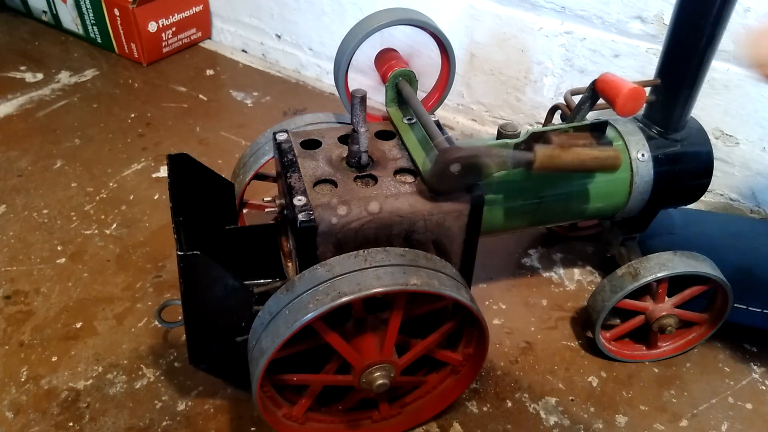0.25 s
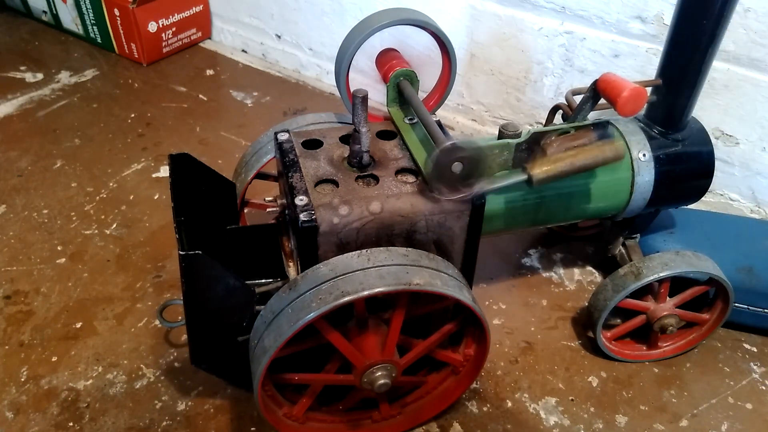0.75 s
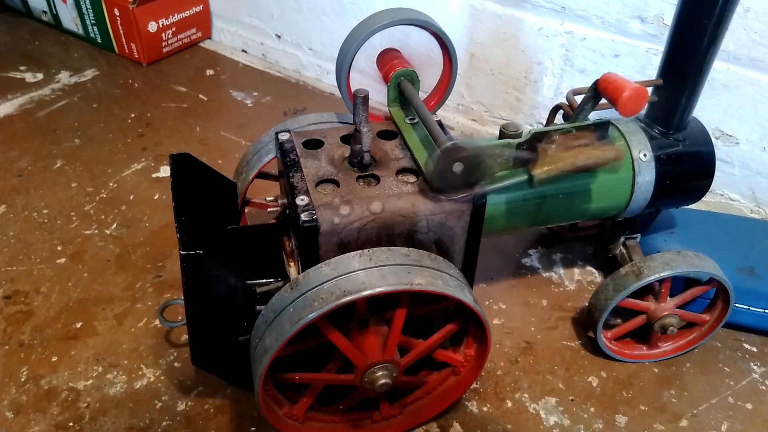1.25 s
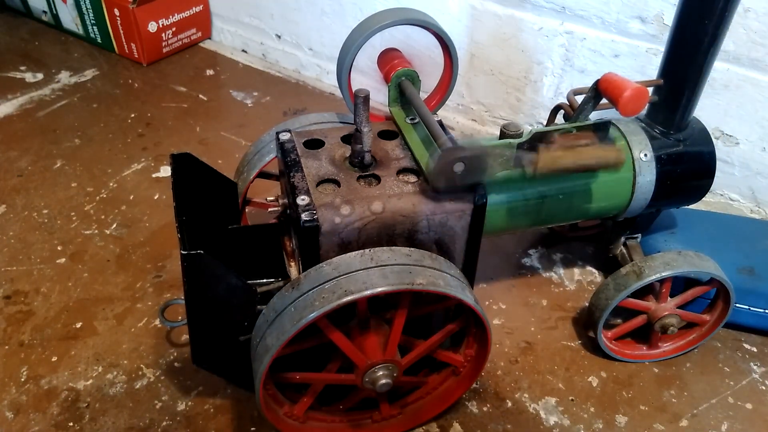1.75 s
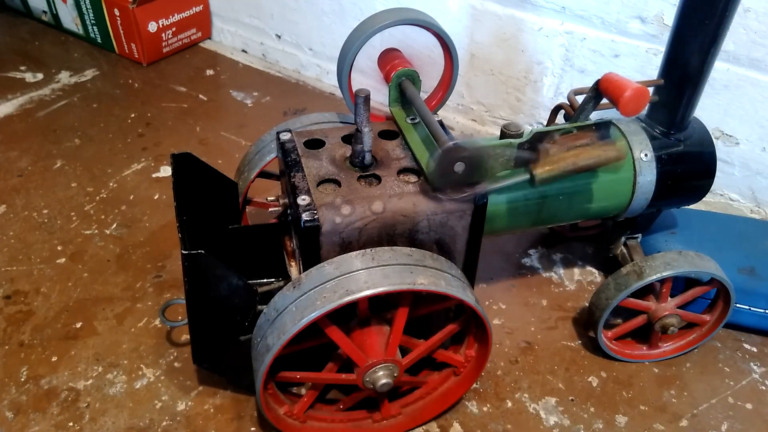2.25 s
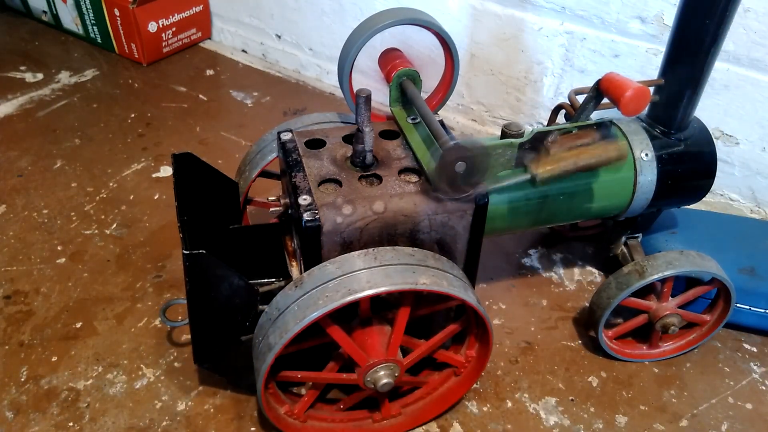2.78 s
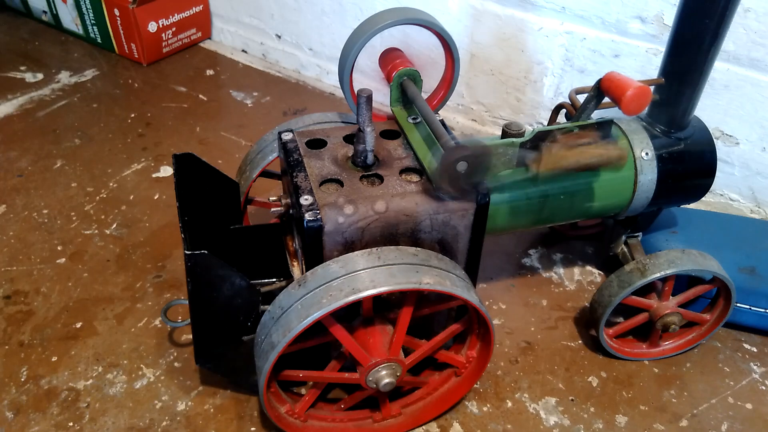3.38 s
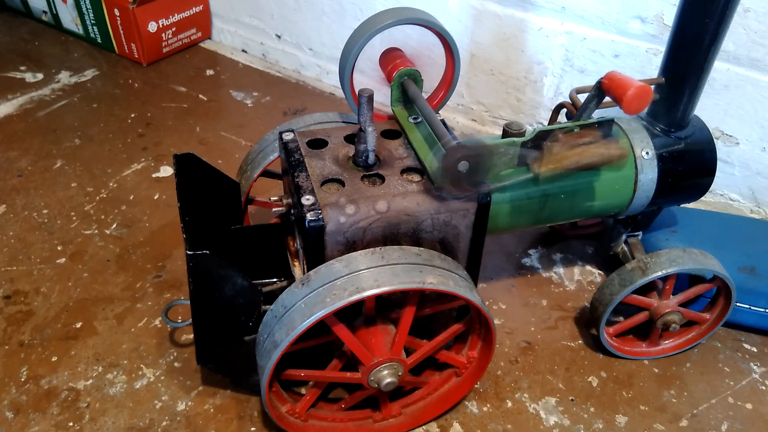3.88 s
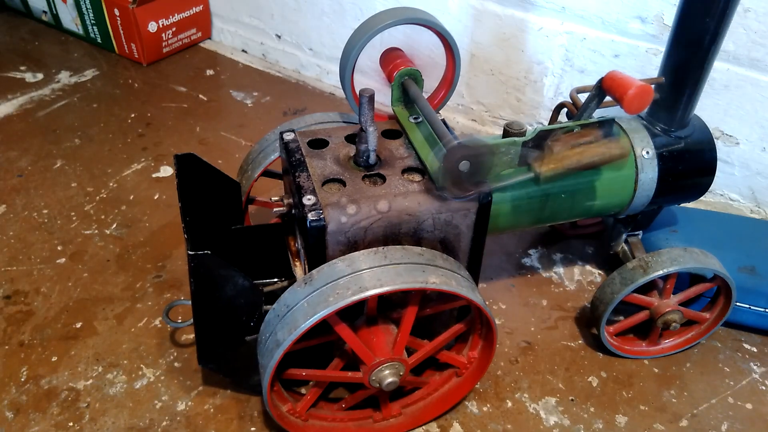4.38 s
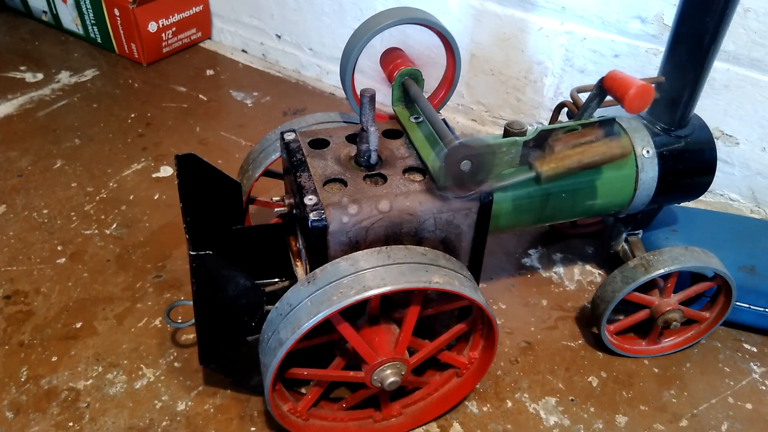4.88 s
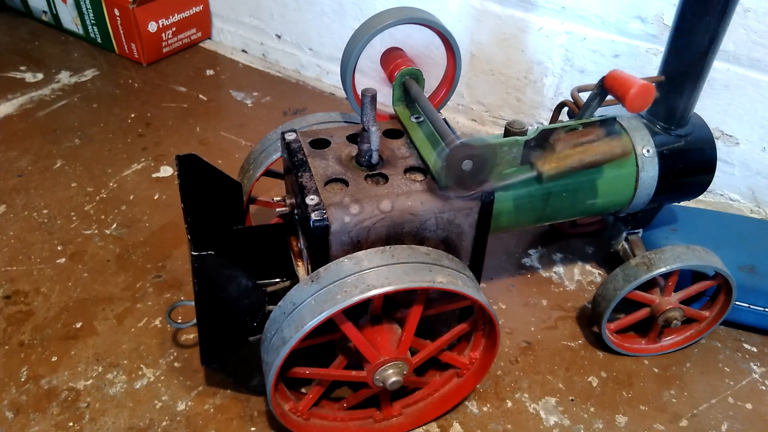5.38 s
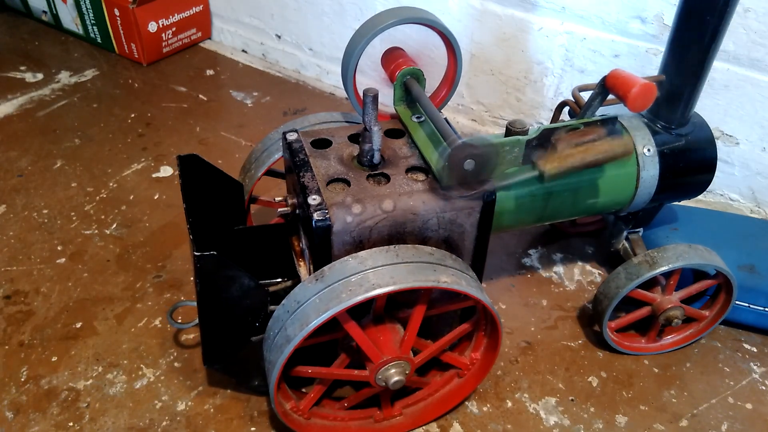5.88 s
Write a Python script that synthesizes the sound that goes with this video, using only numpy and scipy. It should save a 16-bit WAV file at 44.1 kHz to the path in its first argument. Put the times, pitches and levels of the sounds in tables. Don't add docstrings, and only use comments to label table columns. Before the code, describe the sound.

Close stereo in a small room with a short, dull echo. At 0 s a hand releases a lever with two soft chattering knocks and a tiny spit of steam; a toy steam engine turns, its low wooden knocks quickening from about six to seventeen a second, exhaust choked by water. Around 0.7 to 0.9 s slugs crack and gurgle, then the port clears: from about 1.0 to 1.7 s a loud, wet, bright rush of steam sputters, fizzes and whistles thinly in rapid puffs, two per turn, while bench booms, boiler clanks and loose parts rattle. From 1.75 to 2.7 s the blasts weaken unevenly, with renewed dry knocking and fizz. After about 2.75 s it drops to much quieter, dry, even chuffing at nearly twenty-four turns a second, a buzzing patter with light ticking, faint leak hiss, softly ringing plates and occasional small spits until 6 s.

```python
import sys
import numpy as np
from scipy import signal
from scipy.fft import rfft, irfft, next_fast_len
from scipy.io import wavfile
from scipy.ndimage import uniform_filter1d

SR = 44100
rng = np.random.default_rng(int(sys.argv[2]) if len(sys.argv) > 2 else 0)


def log_audio(samples):
    frames = np.atleast_2d(samples).T
    limited = np.clip(frames, -1, 1)
    pcm = np.round(limited * 32767).astype(np.int16)
    wavfile.write(sys.argv[1], SR, pcm)


def ratio_of_db(decibels):
    return 10 ** (np.asarray(decibels, float) / 20)


N = 270333
SIZE = next_fast_len(N)
TIME_S = np.arange(N) / SR
FFT_HZ = np.arange(SIZE // 2 + 1) * SR / SIZE

# time in seconds, speed in turns per second.
SPEED = [(-.12, 5.731), (.2, 11.565), (.5, 13.709), (.8, 17.058), (1.05, 17.931), (1.2, 19.224),
         (1.6, 20.838), (2, 21.935), (2.5, 22.903), (3.2, 23.629), (4, 23.863), (6.3, 23.972)]
# time in seconds, steam flow in dB, load on rod and bearings in dB,
# rocking on the bench in dB.
EFFORT = [(0, -3.5, -40, -16), (.29, -7.5, -29, -0.5), (.45, 1.5, 1, 5), (.6, 1.5, 5, 8), (.74, -5, 7, 12),
          (.84, 12, 15, 14), (1.07, 18.5, 17.5, 13), (1.2, 17.5, 12.5, 15), (1.55, 21.5, 10.5, 15.5),
          (1.86, 18, 12.5, 13), (1.96, 18, 10.5, 6.5), (2.04, 16.5, 19, 2.5), (2.13, 15.5, 8.5, 7.5),
          (2.66, 17.5, 9.5, -1.5), (2.75, 2, 5.5, 0.5), (3.3, 3.5, 3, -1), (4.2, 1, 2, 2),
          (6.13, 1.5, 2.5, 0)]
# frequency in Hz, density in dB per Hz.
MAIN_COLOUR = [(530, -38), (900, 0.5), (1850, -2), (3300, 2.5), (4150, 4.5), (4800, 0), (6250, 1.5),
               (8550, 3), (10600, 1), (11600, -4.5), (14400, -3), (16000, -12)]

FULL_SPEED = 24
CLEARS_S, CHOKED_LEAD_S = 0.9, .007
SLIP = .24
LIGHT_TOP_DB = -4
LAG_S = 0.00015


def rms_one(x):
    return x / np.sqrt(np.mean(x ** 2) + 1e-20)


def evened(x):
    power = np.mean(np.atleast_2d(x) ** 2, axis=0)
    return x / np.sqrt(uniform_filter1d(power, size=SR // 4) + 1e-12)


def in_time(rows):
    s, *columns = np.transpose(rows)
    return [np.interp(TIME_S, s, c) for c in columns]


def at_hz(points, hz):
    point_hz, value = np.array(points).T
    return np.interp(np.log(np.maximum(hz, 1)), np.log(point_hz), value)


def bout(s, length, db, swell, ebb):
    before_s = np.maximum(s - TIME_S, 0)
    after_s = np.maximum(TIME_S - s - length, 0)
    return ratio_of_db(db - swell * before_s - ebb * after_s)


def drift(rate_hz):
    r = np.exp(-2 * np.pi * rate_hz / SR)
    noise = rng.standard_normal(N + SR)
    return rms_one(signal.lfilter([1], [1, -2 * r, r * r], noise)[SR:])


def single_hit(s):
    return signal.unit_impulse(N, round(s * SR))


def fading(clicks, t60, rise_s):
    up = np.exp(-1 / (rise_s * SR))
    fall = signal.lfilter([1], [1, -ratio_of_db(-60 / (t60 * SR))], clicks)
    return signal.lfilter([1 - up], [1, -up], fall)


def ring(clicks, modes):
    out = 0
    for hz, level_db, t60 in modes:
        r, w = ratio_of_db(-60 / (t60 * SR)), 2 * np.pi * hz / SR
        out = out + ratio_of_db(level_db) * signal.lfilter([0, np.sin(w)], [1, -2 * r * np.cos(w), r * r], clicks)
    return out


def crank():
    s = np.arange(SPEED[0][0], SPEED[-1][0], .001)
    return s, -1.002 + np.cumsum(np.interp(s, *np.transpose(SPEED))) * .001


def once_a_turn(angle, spread_db, jitter_s, delay_s=0, slip=0, lead_s=0):
    s, turns = crank()
    chance = rng.standard_normal((int(turns[-1]), 2))
    at_s = np.interp(np.arange(len(chance)) - 1 + angle, turns, s)
    speed = np.interp(at_s, *np.transpose(SPEED))
    slip_s = slip * (1 - speed / FULL_SPEED) / speed
    early_s = lead_s * (at_s < CLEARS_S)
    at = (at_s + slip_s - early_s + delay_s + jitter_s * chance[:, 0]) * SR
    inside = (at >= 0) & (at < N)
    clicks = np.full(N, 1e-18)
    clicks[at[inside].astype(int)] = ratio_of_db(spread_db * chance[inside, 1])
    return clicks


def by_turn():
    s, turns = crank()
    whole_turns = np.floor(np.interp(TIME_S, s, turns) + .05)
    return np.interp(whole_turns + .25, turns, s)


def hiss(spectrum, top_db, jet_db):
    # frequency in Hz, width in Hz, level in dB.
    nozzle = [(5140, 190, -27.5), (7680, 540, -16.5), (9250, 120, -12.5), (11530, 200, -9.5),
              (12400, 280, -19)]
    # frequency in Hz, likeness from 0 to 1.
    likeness = [(100, 1), (500, 0.55), (1500, 0.33), (4000, 0.22), (12000, 0.075)]
    peaks = 0
    for centre_hz, width_hz, db in nozzle:
        peaks = peaks + ratio_of_db(db + jet_db) / np.sqrt(1 + (2 * (FFT_HZ - centre_hz) / width_hz) ** 2)
    alike = np.clip(at_hz(likeness, FFT_HZ), 0, 1)
    mid, side = rfft(rng.standard_normal((2, SIZE)))
    both = np.sqrt(1 + alike) * mid + np.sqrt(1 - alike) * side * [[1], [-1]]
    both = both * ratio_of_db(at_hz(spectrum, FFT_HZ)) * (1 + 3 * peaks)
    upper = np.clip((FFT_HZ - 11900) / 300, 0, 1)
    body = irfft(both * (1 - upper), SIZE)[:, :N]
    top = irfft(both * upper, SIZE)[:, :N]
    return (body + top * ratio_of_db(top_db)) / np.sqrt(np.mean(body ** 2))


def exhaust():
    # start in seconds, length in seconds,
    # main puff in dB, return puff in dB, treble in dB.
    surges = [(.71, .06, -7, 4, 17), (.95, .05, 7, -2, 3), (1.005, .215, 7, -2, 10.5),
              (1.22, .2, 7.5, -5, 21), (1.425, .29, 4.5, -3.5, -6), (1.855, .09, 4, 0, 10),
              (2.08, .18, 3, 4.5, 10), (2.265, .085, 0.5, 4.5, 9), (2.615, .085, 2, 1.5, 0),
              (2.875, .04, 0, 3, 8), (3, .085, 3.5, 7, -1)]
    # start in seconds, peak in dB, treble against body in dB.
    wet_puffs = [(0.8477, -39, -21), (0.9051, -36, -22), (0.963, -28, -17), (1.0188, -22, -18),
                 (1.0752, -23, -12), (1.1286, -22, -19), (1.1815, -23, -13), (1.2343, -18, -7),
                 (1.2857, -20, -5), (1.3361, -19, -7), (1.3865, -19, -8), (1.4364, -21, -24),
                 (1.4853, -20, -26), (1.5342, -19, -18), (1.5826, -24, -24), (1.6299, -25, -30),
                 (1.6783, -24, -31), (1.7257, -31, -34), (1.7726, -30, -40), (1.82, -29, -23),
                 (1.8654, -26, -20), (1.9113, -25, -10), (1.9572, -32, -16), (2.0036, -32, -22),
                 (2.0485, -33, -23), (2.0944, -29, -9), (2.1403, -25, -15), (2.1847, -26, -10),
                 (2.2291, -25, -11), (2.2735, -28, -17), (2.3179, -28, -17), (2.3623, -28, -21),
                 (2.4072, -30, -19), (2.4501, -30, -26), (2.494, -30, -19), (2.5379, -30, -26),
                 (2.5813, -30, -22), (2.6257, -27.5, -15), (2.6691, -27, -30)]
    at = by_turn()
    flow_db = np.interp(at, *np.transpose(EFFORT)[:2])
    wet = np.clip((flow_db - 3.5) / 5, 0, 1)
    choked_db = -23 * (at < CLEARS_S)
    heavy_top_db = -19
    levels_db = np.stack([-52.5 + flow_db + choked_db, -56 + 0.96 * flow_db,
                          LIGHT_TOP_DB + wet * (heavy_top_db - LIGHT_TOP_DB)])
    for s, length, *extra_db in surges:
        levels_db = levels_db + np.outer(extra_db, (at >= s) & (at < s + length))
    main_db, return_db, top_db = levels_db
    wet_puffs = np.array(wet_puffs)
    latest = np.maximum(np.searchsorted(wet_puffs[:, 0], at) - 1, 0)
    s, peak_db, share_db = wet_puffs[latest].T
    listed = (at > s) & (at < s + .025)
    main_db = np.where(listed, peak_db - 8.5, main_db)
    return main_db, return_db, top_db, np.where(listed, share_db + 10.5, top_db)


def steam(leak_db):
    # frequency in Hz, density in dB per Hz.
    return_colour = [(1500, -61), (3000, -6.5), (4500, 3.5), (6000, -18), (7500, -3.5), (9500, 4),
                     (11000, -3), (12800, -3), (14500, -7), (16000, -32)]
    leak_colour = [(60, -11), (400, -8), (600, -2), (1000, 2.5), (1400, -8.5), (2200, -0.5), (2800, -2),
                   (3250, -3), (3900, 0.5), (4800, -4), (5500, 2.5), (6300, -5), (8000, -5), (9300, -4.5),
                   (11600, -5.5), (14900, -4), (16000, -11)]
    main_db, return_db, top_db, main_top_db = exhaust()

    first = ratio_of_db(main_db + 3) * once_a_turn(0, spread_db=.8, jitter_s=.0002)
    first[round(.761 * SR)] = ratio_of_db(-55)
    opening = first + ratio_of_db(-12.5) * np.roll(first, shift=round(SR / 300))
    main = ratio_of_db(1.0) * fading(opening, t60=0.026, rise_s=0.00022)
    main += ratio_of_db(-9.0) * fading(opening, t60=0.061, rise_s=0.0061)
    main_top = ratio_of_db(2.0) * fading(first, t60=0.026, rise_s=0.00043) + ratio_of_db(-15.5) * main
    main_top_db = main_top_db + 7.5 + 20 * np.log10(main_top / main)
    out = main * ratio_of_db(0.48 * drift(360)) * hiss(MAIN_COLOUR, main_top_db, jet_db=12.5)

    second = ratio_of_db(return_db + 3) * once_a_turn(0.517, spread_db=1.6, jitter_s=.0003, slip=SLIP)
    back = fading(second, t60=0.053, rise_s=0.0032)
    back_top = fading(second, t60=0.022, rise_s=.0002) + ratio_of_db(-6) * back
    back_top_db = np.minimum(top_db, 3) + 7.0 + 20 * np.log10(back_top / back)
    out += back * ratio_of_db(1.6 * drift(190)) * hiss(return_colour, back_top_db, jet_db=-35)

    flicker_db = 1.5 * drift(150) + .8 * drift(8)
    pulse_db = 2.3 * np.cos(4 * np.pi * (np.interp(TIME_S, *crank()) - .14))
    leak_top_db = 0.99 * np.minimum(top_db, LIGHT_TOP_DB) + 7.0
    out += ratio_of_db(leak_db - 4.0 + flicker_db + pulse_db) * hiss(leak_colour, leak_top_db, jet_db=4.0)
    return out + spits()


def spits():
    # start in seconds, level in dB, t60 in seconds.
    drops = [(.001, -52, 0.087), (0.094, -53, 0.08), (0.429, -54, 0.12), (0.64, -54, 0.13),
             (.7, -45.5, 0.065), (0.761, -42.5, 0.07), (.847, -35.5, 0.045), (.905, -35, 0.038),
             (3.501, -46.5, 0.15), (3.525, -54.5, 0.81), (4.612, -48, 0.094), (4.9, -53, 0.12),
             (5.554, -49, 0.073), (5.655, -51.5, 0.13)]
    bursts = 0
    for s, db, t60 in drops:
        bursts = bursts + fading(ratio_of_db(db) * single_hit(s) + 1e-18, t60, rise_s=0.002)
    sputter = ratio_of_db(3.5 * drift(200))
    return bursts * sputter * hiss(MAIN_COLOUR, -25, jet_db=-24)


def band_shaped(x):
    # start in seconds, length in seconds, change in dB.
    band_changes = [
        (0.836, .12, -14),
        (1.19, 0.44, 4),
        (1.723, 0.19, -10),
        (1.953, .14, -7),
        (2.126, 0.39, 3),
    ]
    band = irfft(rfft(x, SIZE) * ((FFT_HZ > 9700) & (FFT_HZ < 12100)), SIZE)[:, :N]
    level_db = sum(db * ((TIME_S > s) & (TIME_S < s + length)) for s, length, db in band_changes)
    return x + (ratio_of_db(uniform_filter1d(level_db, size=SR // 100)) - 1) * band


def knocks(boom_db, bench_db, boiler_db, firebox_db, tick_db):
    # crank angle in turns, delay in seconds,
    # push (+) or pull (-), boom in dB, bench in dB, shell in dB.
    contacts = [
        (0, .00027, -.69, -14, 7, -10),
        (0, .003, .61, -8, 6, -6),
        (0, .0057, -.17, -23, 1, 4.5),
        (0, .0084, .53, -3.5, -21, -12),
        (0, .0155, 1, 2.5, -1, -8),
        (.536, .0036, .76, -12, -27, -4),
        (.858, .00058, -.61, -28, -10, -7),
    ]
    # crank angle in turns, delay in seconds,
    # cylinder in dB, linkage in dB.
    face_taps = [
        (0, .001, -9, -9),
        (0, .004, -7, -6),
        (.46, .001, -6, -12),
        (.535, .0022, -4, -12),
        (.535, .0042, -2, -8),
        (.85, .0003, -9, -3),
        (.32, .0003, -20, -6),
    ]
    # frequency in Hz, level in dB, t60 in seconds.
    boom_modes = [(72.4, -30, 0.084), (93.4, -4.5, 0.2), (125.2, 3, 0.24), (144.3, -10, 0.14)]
    bench_modes = [(214.5, -6, .065), (234.75, -6, .025), (314, -12.5, .026), (415, -14, .031)]
    boiler_modes = [(552.5, 10.5, 0.56), (653, 2, 0.7), (726, 5.5, 0.068), (616, 13.5, 0.066)]
    firebox_modes = [(889, -12.5, 0.12), (940, 3, 0.011), (1099, -19, 0.16), (1496, -9, 0.049),
                     (1734, 6, 0.011), (1560, -25, 0.055), (2215, -6, 0.074)]
    cylinder_modes = [(2980, -14, .012), (3780, -3, .016), (3930, 0, .022), (4280, -7, .014),
                      (5550, -12, .015)]
    linkage_modes = [(1566, -11, 0.011), (1797, 10, 0.015), (2156, -11.5, 0.11), (2280, -2, 0.014),
                     (2942, 6.5, 0.028)]
    s, turns = crank()
    speed = np.interp(TIME_S, s, np.gradient(turns, s)) / FULL_SPEED

    boom = bench = shell = 0
    for angle, delay_s, sign, into_boom_db, into_bench_db, into_shell_db in contacts:
        blow = sign * once_a_turn(angle, spread_db=.8, jitter_s=.00003, delay_s=delay_s,
                                  slip=SLIP * (angle > .5), lead_s=CHOKED_LEAD_S)
        blow *= speed ** (250 * delay_s + 3 * angle)
        boom = boom + ratio_of_db(into_boom_db) * blow
        bench = bench + ratio_of_db(into_bench_db) * blow
        shell = shell + ratio_of_db(into_shell_db) * abs(blow)
    taps = links = 0
    for angle, delay_s, cylinder_db, linkage_db in face_taps:
        tap = once_a_turn(angle, spread_db=1.7, jitter_s=.0003, delay_s=delay_s, slip=SLIP * (angle > .5))
        taps = taps + ratio_of_db(cylinder_db) * tap
        links = links + ratio_of_db(linkage_db) * tap

    late, early = np.roll(boom, round(.003 * SR)), np.roll(boom, -round(.0062 * SR))
    boom = np.where(np.arange(N) > CLEARS_S * SR, early, late)
    soft = signal.butter(2, 340, fs=SR)
    low = ratio_of_db(boom_db - 3.0) * evened(ring(signal.lfilter(*soft, boom), boom_modes))
    push = signal.lfilter(*soft, bench)
    weaker = bout(1.7, 0.41, 0, 103, 114)
    upper_bench = ratio_of_db(-15 * weaker) * ring(push, bench_modes[2:])
    low += ratio_of_db(bench_db - 1.0) * evened(ring(push, bench_modes[:2]) + upper_bench)
    low = signal.sosfilt(signal.butter(5, 70, "high", fs=SR, output="sos"), low)

    boiler = ratio_of_db(boiler_db - 8.0) * evened(ring(shell, boiler_modes))
    firebox = ratio_of_db(firebox_db - 3.0) * evened(ring(shell, firebox_modes))
    shell = signal.sosfilt(signal.butter(3, 440, "high", fs=SR, output="sos"), boiler + firebox)

    chatter = fading(taps, t60=.004, rise_s=.0001) * rng.standard_normal(N)
    play = fading(links + 4.4 * abs(bench), t60=0.034, rise_s=0.00012)
    loose = play * rng.standard_normal(N)
    seated = np.clip((speed - .7) / 0.072, .08, 1)
    tick = seated * ratio_of_db(tick_db - 6) * evened(ring(.35 * chatter + 3 * taps, cylinder_modes))
    tick = tick + np.sqrt(seated) * ratio_of_db(tick_db - 12.5) * evened(ring(loose, linkage_modes))
    return deep_shaped(low), shell, tick


def deep_shaped(low):
    # time in seconds, level change in dB.
    deep_level = [(0, -14), (.25, 5.5), (.9, -3), (1.1, 0.5), (1.9, -1), (2.35, -10), (2.6, 4), (3.1, 4.5),
                  (4, -0.5), (5, 4), (6.13, 4.5)]
    deep = irfft(rfft(low, SIZE) / (1 + (FFT_HZ / 101) ** 12), SIZE)[:N]
    return low + (ratio_of_db(in_time(deep_level)[0]) - 1) * deep


def pin():
    # crank angle in turns, delay in seconds, level in dB.
    stroke_ends = [
        (0, .003, 0),
        (.536, .0025, -2),
    ]
    # start in seconds, length in seconds, level in dB.
    bouts = [
        (.84, .3, -59),
        (2.297, .42, -56.5),
        (2.906, 4, -67),
    ]
    # frequency in Hz, level in dB, t60 in seconds.
    pin_modes = [(528, -9.5, 0.018), (695, -2.5, 0.017), (826, -3, 0.017), (1800, -7.5, 0.019)]
    blows = 0
    for angle, delay_s, db in stroke_ends:
        blows = blows + ratio_of_db(db) * once_a_turn(angle, spread_db=1.5, jitter_s=.0001, delay_s=delay_s,
                                              slip=SLIP * (angle > .5))
    return sum(bout(*row, 65, 80) for row in bouts) * evened(ring(blows, pin_modes))


def rattles():
    # start in seconds, length in seconds,
    # frequency in Hz, level in dB, ring in cycles.
    loose_parts = [(0.87, 0.78, 511, -51.5, 19), (1.76, 0.6, 520, -59.5, 48), (1.98, 0.3, 1130, -61, 40),
                   (.45, 0.27, 123.5, -52.5, 18), (1.42, 0.24, 735, -50.5, 47),
                   (1.884, 0.64, 737, -54.5, 66), (1.54, 0.89, 900, -58, 260), (2.48, 0.11, 905, -51, 116),
                   (2.67, 0.37, 905, -65.5, 160), (2.31, 0.21, 133.6, -57, 19),
                   (2.46, 0.034, 208, -52, 6.4), (2.37, 0.28, 652, -61, 69), (1.94, 0.025, 175, -57, 27),
                   (3.63, 0.081, 1560, -63.5, 54), (3.4, 0.038, 1800, -70, 41),
                   (3.43, 0.044, 1580, -68.5, 25), (0.8, .02, 1110, -60, 27), (0.925, 0.043, 890, -53, 52),
                   (1.03, 0.11, 1120, -56, 61)]
    plates = [(2.8, 3.2, 741, -73, 170), (3.4, 2.8, 645, -73.5, 110), (3.98, 0.49, 1450, -69.5, 47),
              (4.4, 2.9, 479, -74.5, 160), (3.9, 2.7, 405, -73, 120), (3.2, 1.9, 744, -83, 52),
              (3.7, 2.8, 330, -75, 70), (3.75, 2.6, 527, -77.5, 39), (3.5, 2.8, 1050, -84.5, 98),
              (3.2, 3, 865, -79.5, 130)]
    blow = once_a_turn(0, spread_db=.8, jitter_s=.00004, delay_s=0.00301)
    out = 0
    for s, length, hz, db, cycles in loose_parts + plates:
        out = out + bout(s, length, db, 133, 77) * evened(ring(blow, [(hz, 0, cycles / hz)]))
    return out


def gurgle():
    # start in seconds, length in seconds, level in dB, frequency in Hz.
    water = [(0.42, 0.2, -68.5, 333), (0.71, 0.31, -55, 380), (2.4, 0.36, -59.5, 407),
             (2.95, .06, -65.5, 392), (3.2, 0.27, -64, 410), (5.8, 0.063, -68, 374), (2.56, 0.4, -59, 5550),
             (2.03, 0.37, -50, 4150), (2.49, 0.27, -53, 4300), (2.7, .3, -64.5, 4400),
             (1.41, 0.27, -49.5, 11000), (0.99, 0.15, -47, 6070)]
    strokes = once_a_turn(0, spread_db=2.5, jitter_s=.001, lead_s=CHOKED_LEAD_S)
    noise = rng.standard_normal(N)
    slosh = noise * fading(strokes, t60=0.064, rise_s=.003)
    fizz = noise * fading(strokes, t60=0.056, rise_s=0.00042)
    out = 0
    for s, length, db, hz in water:
        source = slosh if hz < 1000 else fizz
        out = out + bout(s, length, db, 86, 63) * evened(ring(source, [(hz, 0, 21.0 / hz)]))
    return out


def whistles():
    # start in seconds, length in seconds, level in dB, frequency in Hz, width in Hz.
    jets = [(2.5, 0.48, -59.5, 5600, 780), (0.9, .2, -57.5, 2900, 570), (0.8, .3, -64, 5120, 1100),
            (1.4, .4, -57, 6800, 80), (2.2, 0.43, -58, 7000, 70), (0.7, .25, -56, 9900, 72),
            (2.5, .55, -62.5, 13000, 120), (0.5, 0.67, -70, 3000, 900)]
    noise, out = rng.standard_normal(N) * ratio_of_db(1.2 * drift(30)), 0
    for s, length, db, hz, width_hz in jets:
        mode = [(hz, 0, 3.6 / width_hz)]
        out = out + bout(s, length, db, 170, 250) * rms_one(ring(ring(noise, mode), mode))
    return out


def lever():
    # start in seconds, level in dB.
    releases = [
        (.001, -53.5),
        (.097, -60),
    ]
    # frequency in Hz, level in dB, t60 in seconds.
    lever_modes = [(1120, -1.5, 0.028), (1550, -7, .02), (2480, -8, .02), (413, -9, 0.017)]
    knock = sum(ratio_of_db(db) * single_hit(s) for s, db in releases) + 1e-18
    chatter = fading(knock, t60=0.049, rise_s=.001) * rng.standard_normal(N)
    return ring(chatter, lever_modes) * ratio_of_db(-14.0)


def room(x):
    t60_s, cut_hz = .16, 4500
    size = next_fast_len(N + SR // 2)
    w = 2 * np.pi * np.arange(size // 2 + 1) / size
    dull = 1 / np.sqrt(1 + (w * SR / (2 * np.pi * cut_hz)) ** 2)
    out = np.zeros((2, len(w)), complex)
    for k, lag in enumerate(rng.uniform(.009, .03, 10) * SR):
        loop = dull * ratio_of_db(-60 * lag / SR / t60_s) * np.exp(-1j * w * lag)
        out[k % 2] += (-1) ** (k // 2) * loop / (1 - loop)
    return irfft(out * rfft(x, size), size)[:, :N]


def scene():
    # steady level in dB, share of flow, share of load,
    # share of rocking.
    follows = [
        (-56, 0.14, 0.023, 1),
        (-61, 0.082, 0.36, 0.49),
        (-73, 0.98, 0.29, 0.096),
        (-66, 0.37, 0.74, 0.24),
        (-61, 0.033, 0.96, 0.3),
    ]
    # frequency in Hz, density in dB per Hz.
    floor_colour = [(180, -27), (300, -8.5), (667, -25), (1580, -11), (1870, -31), (2610, -12), (3760, -28),
                    (6620, -10.5), (8090, -11), (10600, -10), (16000, -33)]
    effort_db = np.array(in_time(EFFORT))
    low, shell, tick = knocks(*[db + np.dot(shares, effort_db) for db, *shares in follows])
    shell = shell + rattles() + pin()
    facing = np.stack([tick, np.roll(tick, round(.7 * LAG_S * SR))])
    jets = band_shaped(steam(-58 + effort_db[0])) + whistles()
    engine = jets + low + shell + facing + gurgle() + lever()
    echo = room(ratio_of_db(-13.0) * shell + ratio_of_db(-6.0) * tick + ratio_of_db(-19.5) * engine.mean(axis=0))
    return engine + echo + ratio_of_db(-61.5) * hiss(floor_colour, 0, jet_db=-40)


def roll_off(x):
    return signal.sosfilt(signal.butter(12, 16800, fs=SR, output="sos"), x)


def record(dry):
    # frequency in Hz, left minus right in dB.
    shading = [(60, 0), (250, 0.8), (1000, -0.5), (2400, 0.7), (4400, 4.5), (8000, 4), (10000, 3),
               (12000, 18), (16000, 32)]
    lean = ratio_of_db(at_hz(shading, FFT_HZ))
    left = lean / (1 + lean) * 2 * np.exp(-2j * np.pi * FFT_HZ * LAG_S)
    right = 2 / (1 + lean)
    ports = irfft(rfft(dry, SIZE) * [left, right] * (FFT_HZ < 15900), SIZE)[:, :N]
    return roll_off(ports)


dry = scene()
out = record(dry)
log_audio(out)
```